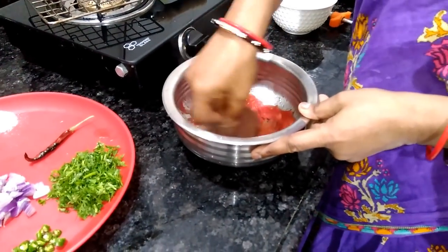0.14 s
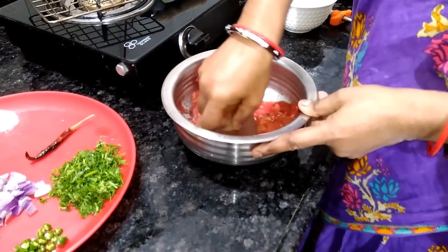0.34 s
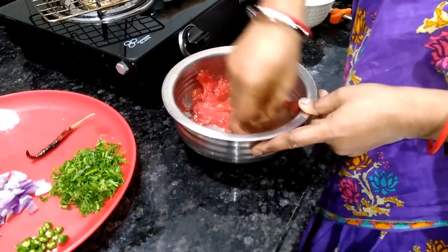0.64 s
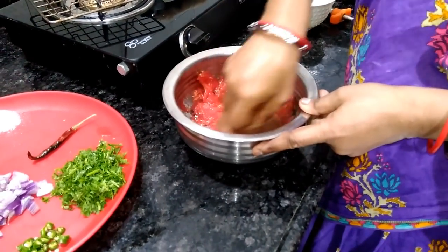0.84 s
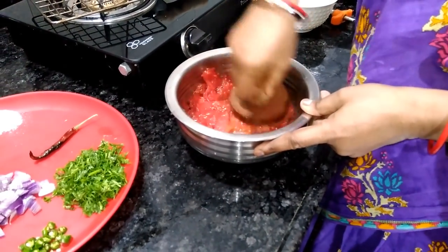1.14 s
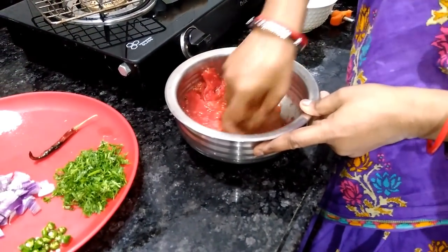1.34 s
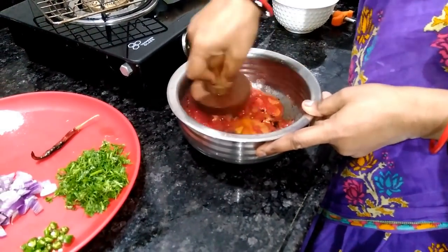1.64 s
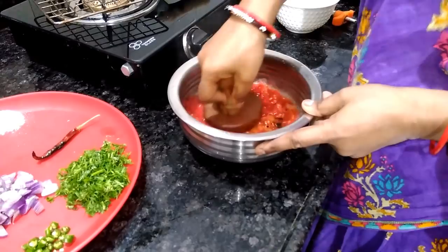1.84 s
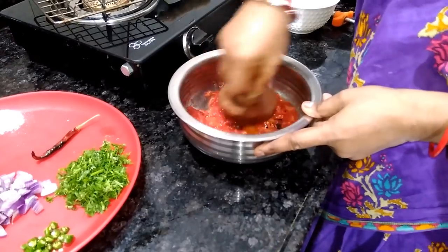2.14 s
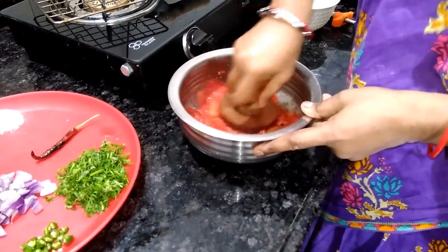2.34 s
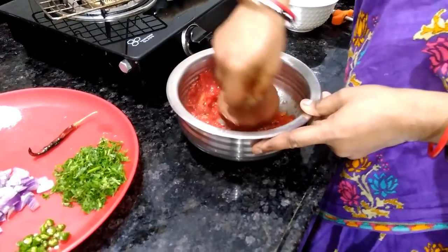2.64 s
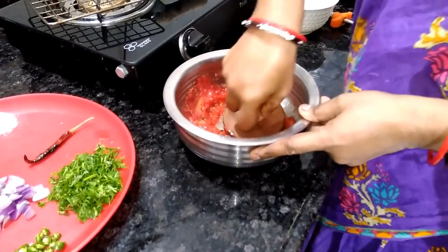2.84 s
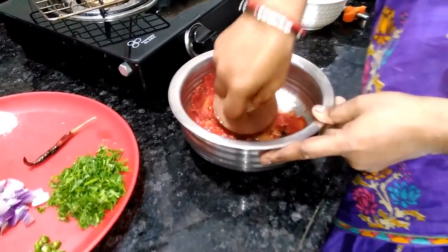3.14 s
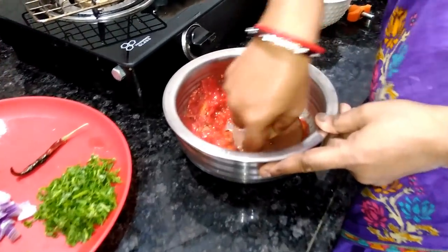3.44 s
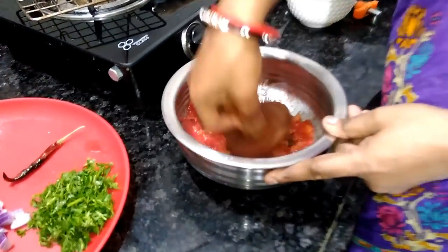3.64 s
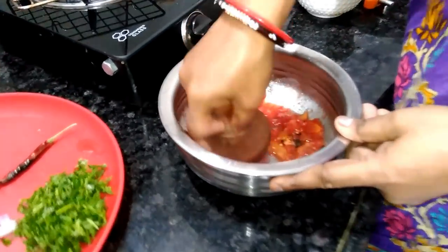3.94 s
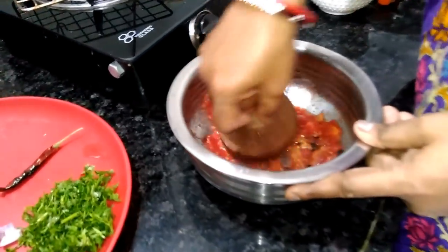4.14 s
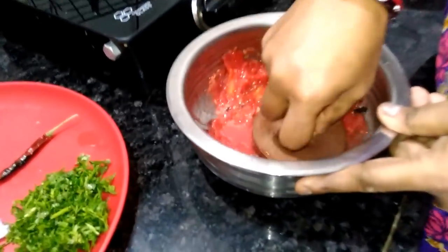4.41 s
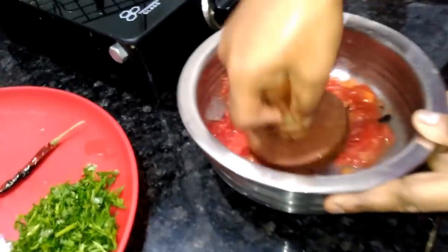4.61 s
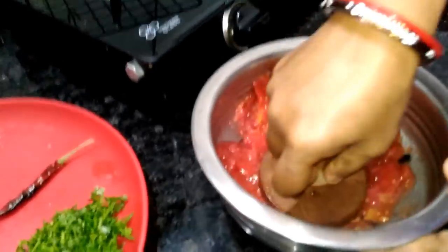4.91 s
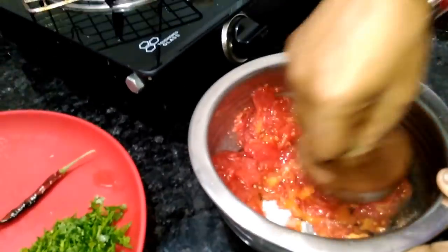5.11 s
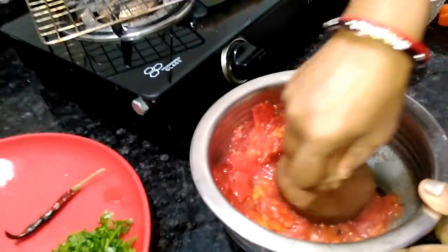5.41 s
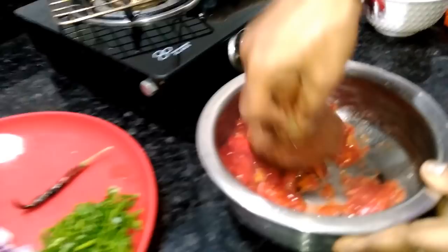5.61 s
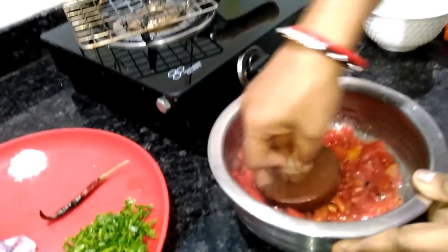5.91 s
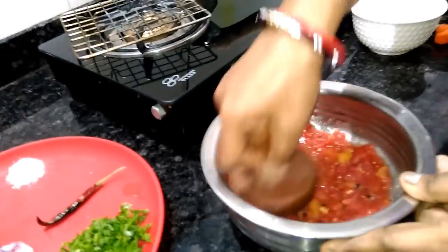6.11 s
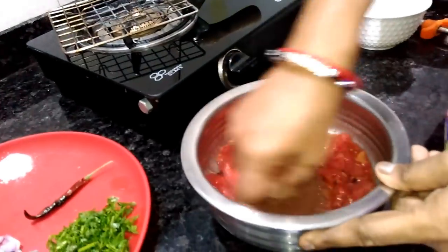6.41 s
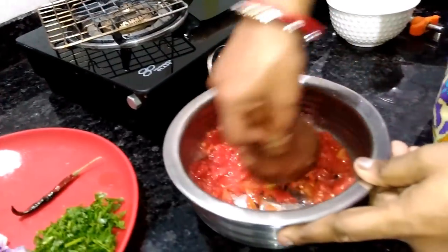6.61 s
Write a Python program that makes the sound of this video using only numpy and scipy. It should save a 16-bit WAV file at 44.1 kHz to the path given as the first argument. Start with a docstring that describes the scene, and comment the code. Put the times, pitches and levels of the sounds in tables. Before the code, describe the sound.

A wooden masher knocks unevenly inside a hand-damped steel bowl, squelching wet tomato pulp, with low hum in a hard kitchen.

```python
"""A hard-walled kitchen with a stone counter, heard through two microphone ports set close together.
A wooden masher crushes tomatoes in a steel bowl: each contact rings the damped modes briefly, with a
crack of noise and a spatter of juice, and the room echoes them. Pulp squelches as filtered grains; drags
of the masher and one pitched spatter are narrow noise. Under it lie room air and a low hum of three
wavering tones in room resonances, where handling thumps sound too; a thin whistle starts at the end."""
import sys
import numpy as np
from scipy import signal
from scipy.fft import rfft, irfft, next_fast_len
from scipy.io import wavfile

SR = 44100
rng = np.random.default_rng(int(sys.argv[2]) if len(sys.argv) > 2 else 0)


def unload_audio(sound):
    """Save the sound as a 16-bit wav file, at the path given as the first command line argument."""
    columns = np.transpose(np.atleast_2d(sound))
    # keep every value between -1 and 1, then stretch to whole-number steps
    steps = np.round(np.clip(columns, -1, 1) * 32767)
    wavfile.write(sys.argv[1], SR, steps.astype(np.int16))


N = 298283   # samples


def amp(db):
    """Decibels to gain."""
    return 10 ** (np.asarray(db) / 20)


def rms_one(x):
    """Scale to unit rms."""
    return x / np.sqrt(np.mean(x ** 2) + 1e-20)


def in_time(rows):
    """Columns of a curve table, joined by straight lines, one value a sample."""
    s, *columns = np.transpose(rows)
    return [np.interp(np.arange(N) / SR, s, column) for column in columns]


def at_hz(points, hz):
    """Read a spectrum table on a log-frequency axis."""
    point_hz, values = np.array(points)[:, 0], np.array(points)[:, 1]
    return np.interp(np.log(np.maximum(hz, 1)), np.log(point_hz), values)


def coloured(x, spectrum):
    """Impose a spectrum on a signal."""
    size = next_fast_len(len(x))
    gain = amp(at_hz(spectrum, np.fft.rfftfreq(size, 1 / SR)))
    return irfft(rfft(x, size) * gain, size)[:len(x)]


def drift(rate_hz):
    """Slow chance with unit rms: noise through two equal low-pass poles, made at every 40th sample."""
    pole = np.exp(-2 * np.pi * rate_hz * 40 / SR)
    noise = rng.standard_normal(N // 40 + 2002)
    slow = signal.lfilter([1], [1, -2 * pole, pole * pole], noise)[2000:]   # drop the filter's start
    return np.interp(np.arange(N) / 40, np.arange(len(slow)), rms_one(slow))


def ring(force, hz, t60):
    """One resonant mode: a unit click sets off a decaying sine of starting height 1."""
    radius, angle = amp(-60 / (t60 * SR)), 2 * np.pi * hz / SR
    return signal.lfilter([0, np.sin(angle)], [1, -2 * radius * np.cos(angle), radius ** 2], force + 1e-18)


def burst_at_contacts(level_db, decay_s):
    """An envelope that jumps up at every contact and dies away exponentially."""
    strength = np.zeros(N)
    strength[(np.array(CONTACTS)[:, 0] * SR).astype(int)] = amp(level_db)
    return signal.lfilter([1], [1, -np.exp(-1 / (decay_s * SR))], strength + 1e-18)


# Air of the room. Each row: frequency in Hz, relative density in dB per Hz.
AIR_SPECTRUM = [(20, -45), (35, -2), (54, -9.5), (80, 0), (125, -3), (176, -4.5), (328, -16.5), (689, -23),
                (1190, -28), (2120, -29.5), (3050, -40), (4500, -51), (8000, -53), (14000, -62)]
AIR_DB = -52.5


def room_air():
    """Steady noise of the room, rumbling low and thin in the treble."""
    return amp(AIR_DB) * rms_one(coloured(rng.standard_normal(N), AIR_SPECTRUM))


# Echo decay of the hard-walled kitchen. Each row: frequency in Hz, time to fall 60 dB in seconds.
KITCHEN_DECAY = [(150, 0.81), (400, 0.62), (1040, 0.59), (2760, 0.48), (7280, 0.39), (14000, 0.062)]
FIRST_ECHO_S = 0.0037   # silence before the echoes, and then their fade-in time


def kitchen(x):
    """Dense echoes: noise that dies away in each band, mostly octaves, at its own pace."""
    t = np.arange(SR) / SR
    echoes, edges = np.zeros(SR), 100 * 2. ** np.arange(8)
    for low, high in zip(edges, np.append(edges[1:], .45 * SR)):
        octave = signal.butter(2, [low, high], "band", fs=SR, output="sos")
        band = signal.sosfilt(octave, rng.standard_normal(SR))
        echoes += band * amp(-60 * t / at_hz(KITCHEN_DECAY, np.sqrt(low * high)))
    echoes *= np.clip(t / FIRST_ECHO_S - 1, 0, 1)
    return signal.fftconvolve(x, echoes / np.sqrt(np.sum(echoes ** 2)))[:N]


# Course of the hum. Each row: time in seconds, level of the low tone in dB, of the middle tone in dB.
HUM_LEVELS = [(0.0, -44, -41.5), (0.11, -52, -66), (0.68, -50.5, -49), (1.26, -62, -60.5),
              (1.39, -38, -46.5), (1.88, -52.5, -57), (2.16, -42.5, -48.5), (2.48, -54.5, -43.5),
              (2.63, -53.5, -72), (2.77, -47.5, -46), (3.16, -48.5, -74), (3.24, -48, -43),
              (4.25, -46, -56.5), (4.33, -59, -56), (4.5, -42.5, -46), (4.89, -53.5, -56.5),
              (4.93, -44, -39.5), (5.82, -52.5, -55), (6.65, -47.5, -47.5), (6.76, -51.5, -40)]
# Low thumps of handling, sounding in the same three resonances.
# Each row: peak time in seconds, level in the low, middle and high resonance in dB.
LOW_THUMPS = [(0.45, -57, -62, -44), (0.94, -42.5, -55.5, -71), (2.371, -38.5, -37.5, -53),
              (3.03, -44, -70, -85), (3.69, -31, -54, -51), (3.99, -41, -57, -55.5),
              (4.12, -51.5, -64, -49), (4.22, -34, -48, -65), (4.52, -39, -50, -54),
              (4.95, -37.5, -30, -43), (5.74, -40, -66, -60)]
HUM_HZ, HUM_WANDER_HZ, WANDER_RATE_HZ = (60.6, 102.8, 158.3), (6, 3, 8), 9
HUM_HIGH_DB, WAVER_DB, WAVER_RATE_HZ = -57.5, 3, 3.7
THUMP_S = 0.017   # from the peak of a thump to 1/e


def hum_and_thumps():
    """Low tones wander about the room resonances: a wavering hum, and thumps of handling on the same tones."""
    tones = []
    for hz, wander_hz in zip(HUM_HZ, HUM_WANDER_HZ):
        pitch_hz = hz + wander_hz * drift(WANDER_RATE_HZ)
        tones.append(np.sin(2 * np.pi * np.cumsum(pitch_hz) / SR))
    s, *thump_db = np.transpose(LOW_THUMPS)
    bumps = np.exp(-((np.arange(N) / SR - s[:, None]) / THUMP_S) ** 2)
    thumps = amp(thump_db) @ bumps
    courses_db = (*in_time(HUM_LEVELS), HUM_HIGH_DB)
    hum = [amp(db + WAVER_DB * drift(WAVER_RATE_HZ)) for db in courses_db]
    # root two makes the levels those of rms
    return np.sqrt(2) * sum((a + b) * tone for a, b, tone in zip(hum, thumps, tones))


WHISTLE_AT_S, WHISTLE_SWELL_S = 6.55, 0.11
WHISTLE_HZ, WHISTLE_DB, FLUTTER_DB, FLUTTER_RATE_HZ = 3290, -57, 2.5, 53


def whistle():
    """A thin sine of fixed pitch and fluttering level that swells in and holds."""
    t = np.arange(N) / SR
    swell = np.clip((t - WHISTLE_AT_S) / WHISTLE_SWELL_S, 0, 1) ** 2
    level = np.sqrt(2) * amp(WHISTLE_DB + FLUTTER_DB * drift(FLUTTER_RATE_HZ))
    return swell * level * np.sin(2 * np.pi * WHISTLE_HZ * t)


OOZE_PEAK_S = 0.084   # from a thud to the peak of its ooze


def ooze():
    """Pulp oozes back after each thud: a swell that peaks at the thud's strength and fades."""
    contacts = np.array(CONTACTS)
    late = np.maximum(np.arange(N) / SR - contacts[:, :1], 0) / OOZE_PEAK_S
    return amp(contacts[:, 1]) @ (late * np.exp(1 - late)) ** 2


# Pulp worked round the bowl. Each row: time in seconds, squelch level in dB, wet hiss level in dB.
SQUELCH_LEVELS = [(0, -59.5, -74), (.52, -52.5, -82.5), (.83, -65, -74), (1.1, -63, -77.5),
                  (1.9, -62, -77.5), (2.9, -57.5, -83), (3.26, -56.5, -80.5), (3.99, -53, -77),
                  (4.27, -50, -73), (4.7, -47.5, -76.5), (5.3, -53, -79), (5.7, -57.5, -71.5),
                  (6.06, -54, -77), (6.5, -52.5, -79.5), (6.76, -51, -78)]
# Colour of the squelch. Each row: frequency in Hz, relative gain in dB.
PULP_SPECTRUM = [(120, -18.5), (200, 0), (400, -7), (680, -8), (940, -9), (1340, -26), (3050, -40),
                 (6000, -52), (14000, -60)]
# Colour of the juice hiss. Each row: frequency in Hz, relative gain in dB.
HISS_SPECTRUM = [(2000, -9.5), (3500, -1), (5000, -11.5), (8000, -15.5), (14000, -19.5)]
OOZE_DB, OOZE_HISS_DB = -38, -67.5   # relative to the thud


def squelch():
    """Uneven wet grains that also stir the bowl modes, with a finer hiss of juice above."""
    squelch_db, hiss_db = in_time(SQUELCH_LEVELS)
    grains = rng.standard_normal(N) * amp(3.0 * drift(25.0) + 3.5 * drift(8.0))
    stirred = np.zeros(N)
    for hz, mode_db, t60 in BOWL_MODES:
        # the modes ring four times longer here than under a contact
        stirred += amp(mode_db + 7.0 * drift(6.0)) * ring(grains, hz, t60 * 4.0)
    mixed = grains + .5 * rms_one(stirred)
    juice = rng.standard_normal(N) * amp(2.5 * drift(40.0))
    back = ooze()
    pulp_level = amp(squelch_db) + amp(OOZE_DB) * back
    juice_level = amp(hiss_db) + amp(OOZE_HISS_DB) * back
    return (pulp_level * rms_one(coloured(mixed, PULP_SPECTRUM))
            + juice_level * rms_one(coloured(juice, HISS_SPECTRUM)))


# Narrow noises: the masher drags and the bowl sings; the 7500 Hz one is a pitched spatter of juice.
# Each row: start in seconds, length in seconds, pitch in Hz, resonance width in Hz, level in dB.
NARROW_NOISES = [(0.995, 0.12, 833, 25, -56.5), (1.245, 0.053, 1070, 40, -46), (2.195, 0.26, 557, 30, -56),
                 (2.56, 0.3, 925, 39, -58.5), (3.627, 0.16, 1660, 59, -65), (4.1, 0.14, 163, 25.45, -45),
                 (4.16, 0.073, 7500, 202, -65.5), (4.267, 0.086, 680, 30.46, -61),
                 (5.802, 0.059, 863, 40, -56.5)]


def narrow_noises():
    """Noise of friction, or of juice at 7500 Hz, held in one narrow resonance that swells and fades."""
    t, noise, out = np.arange(N) / SR, rng.standard_normal(N), np.zeros(N)
    for s, length, hz, width_hz, level_db in NARROW_NOISES:
        swell = np.sin(np.pi * np.clip((t - s) / length, 0, 1)) ** .5
        t60 = np.log(1000) / (np.pi * width_hz)
        out += amp(level_db) * swell * rms_one(ring(noise, hz, t60))
    return out


# Colour of the spattering juice. Each row: frequency in Hz, relative gain in dB.
SPATTER_SPECTRUM = [(4000, 3.5), (5500, -6), (7500, -11), (10000, -10.5), (14000, -30)]
SPATTER_RISE_S, SPATTER_DECAY_S = 0.0053, 0.0052


def spatter():
    """Juice squirts out at each contact: a short, bright, grainy burst."""
    dying = burst_at_contacts(np.array(CONTACTS)[:, 4] + 3, SPATTER_DECAY_S)
    rise = np.exp(-1 / (SPATTER_RISE_S * SR))
    grains = rng.standard_normal(N) * amp(3.0 * drift(200.0))
    return signal.lfilter([1 - rise], [1, -rise], dying) * rms_one(coloured(grains, SPATTER_SPECTRUM))


CRACK_DB, CRACK_DECAY_S, CRACK_BAND_HZ = -34, 0.0011, (3500, 9000)   # level relative to the knock


def crack():
    """Wood on steel: a very short bright snap at the first touch, following the knock."""
    dying = burst_at_contacts(np.array(CONTACTS)[:, 2] + CRACK_DB, CRACK_DECAY_S)
    band = signal.butter(2, CRACK_BAND_HZ, "band", fs=SR, output="sos")
    return signal.sosfilt(band, dying * rng.standard_normal(N))


# Masher contacts. Each row: start in seconds, relative levels of thud, knock, clink and spatter in dB,
# then the two pitches in Hz that the landing spot favours.
CONTACTS = [(0.137, -67, -44.5, -63, -89, 2000, 2330), (0.1905, -37, -43, -49, -51.5, 1360, 2400),
            (0.4358, -16.5, -35.5, -72, -62.5, 590, 1090), (0.5995, -47, -57, -52, -62, 2000, 2640),
            (0.7558, -34, -31.5, -39, -51.5, 1390, 3020), (0.822, -40.5, -35, -46.5, -66, 850, 1360),
            (1.0137, -53.5, -51, -43.5, -53, 2150, 2860), (1.1007, -60, -41, -44.5, -81, 2180, 3010),
            (1.279, -9.5, -0.5, -28.5, -39.5, 655, 1860), (1.516, -37.5, -32.5, -57, -54.5, 664, 1480),
            (1.819, -43, -45.5, -44, -51, 730, 2330), (1.8348, -23.5, -24, -23.5, -28.5, 770, 1560),
            (2.3296, -52, -26.5, -38, -40.5, 1500, 2580), (2.3492, -14, -19, -32, -47, 603, 1500),
            (2.8319, -47, -63, -52.5, -61, 1420, 4220), (2.9947, -43.5, -38.5, -57, -56, 1322, 4450),
            (3.475, -33.5, -37.5, -89, -67, 640, 1247), (3.925, -59.5, -37.5, -77.5, -68, 684, 1610),
            (3.9636, -56.5, -41, -54, -74.5, 1700, 3230), (3.9902, -51.5, -25.5, -44, -59.5, 1990, 2596),
            (4.0103, -51, -42.5, -51.5, -63.5, 2180, 2960), (4.1691, -36, -30.5, -49.5, -49, 1610, 2640),
            (4.365, -52.5, -32, -39, -69.5, 1625, 2775), (4.4275, -11, 1, -27.5, -32, 699, 1577),
            (4.7392, -37.5, -28, -46, -85, 685, 2060), (4.78, -61, -29.5, -51, -92, 1660, 2800),
            (4.8649, -5.5, -8.5, -25.5, -38, 1346, 3580), (4.9294, -21, -50, -31, -34.5, 625, 2700),
            (4.9441, -40, -24, -35, -43.5, 1440, 4850), (5.1494, -58, -32, -61, -64.5, 1120, 2590),
            (5.3672, -5, -3, -23, -49, 720, 2300), (5.3844, -31, -11.5, -25, -37, 677, 1191),
            (5.395, -21, -30, -39, -42, 2490, 3850), (5.7037, -48.5, -47, -51.5, -86, 850, 2270),
            (5.779, -61.5, -46, -66.5, -61, 1645, 3760), (5.8389, -59, -51, -43.5, -45, 2300, 4100),
            (5.8577, -62.5, -60, -61, -44, 1510, 3610), (5.878, -52, -38.5, -65, -66, 1540, 3430),
            (6.3134, -62.5, -59, -60.5, -53, 1294, 4200), (6.3686, -65, -56, -77, -53, 1470, 4250),
            (6.3809, -56, -41.5, -73, -78, 1440, 2950), (6.4226, -28, -42, -68, -66, 760, 1020)]
# The bowl, damped by hand and pulp.
# Each row: mode frequency in Hz, relative level in dB, time to fall 60 dB in seconds after a contact.
BOWL_MODES = [(244.2, -5, 0.065), (312, -2, 0.044), (415.6, 1.5, 0.044), (530.3, -4, 0.056),
              (672.2, -2, 0.045), (791.5, -7, 0.055), (845, -3.5, 0.04), (1039, -11, 0.041),
              (1183, 1.5, 0.013), (1360, 1.5, 0.015), (1500, 0, 0.015), (1610, 0, 0.011), (1775, -3, 0.024),
              (1907, -1.5, 0.0075), (2294, 1.5, .018), (2590, 2, 0.025), (2890, 2.5, 0.019),
              (3018, -1, 0.015), (3650, -4, 0.018), (3868, 4, 0.016), (4250, 1.5, 0.017),
              (4750, -5.5, 0.022)]
# centres of the five mode groups, Hz: push, thud, knock, clink, tick
GROUP_HZ = (244, 680, 1502, 2800, 4200)
# the push follows the thud in part, less where the knock outweighs it
PUSH_DB, PUSH_FOLLOWS, PUSH_LOSS = -16.5, 0.64, 1.2
TICK_DB, TICK_WETNESS = 1, .55   # the tick lies between clink and spatter
FAVOUR_DB, FAVOUR_OCTAVES, STRIKE_SPREAD_DB = 9, 0.093, 1.56
SLIDE_S, HARD_DB = .006, -30   # contacts weaker than a hard blow slide on in several touches
CONTACT_OCTAVES = 0.48   # a soft wet contact drives each mode only near its pitch


def bowl():
    """Every contact strikes all modes; where it lands weights the groups and favours two pitches."""
    s, thud_db, knock_db, clink_db, spatter_db, *favoured_hz = np.transpose(CONTACTS)
    push_db = PUSH_DB + PUSH_FOLLOWS * thud_db - PUSH_LOSS * np.clip(knock_db - thud_db, 0, 12)
    tick_db = TICK_DB + clink_db + TICK_WETNESS * (spatter_db - clink_db)
    contact_groups_db = list(zip(push_db, thud_db, knock_db, clink_db, tick_db))

    # one first touch and three later ones, which only softer contacts sound
    softness = np.clip((HARD_DB - np.maximum(knock_db, clink_db)) / 20, 0, 1)[:, None]
    later = np.sort(rng.random((len(s), 4)), axis=1) * [0, 1, 1, 1] * SLIDE_S * softness
    touch_at = ((s[:, None] + later) * SR).astype(int)
    share = np.where(np.arange(4) == 0, 1, 0.51 * softness)
    share = share / np.linalg.norm(share, axis=1, keepdims=True)

    chance = rng.standard_normal((len(s), len(BOWL_MODES)))
    out = np.zeros(N)
    for k, (hz, mode_db, t60) in enumerate(BOWL_MODES):
        group_db = np.array([at_hz(list(zip(GROUP_HZ, levels)), hz) for levels in contact_groups_db])
        near = sum(np.exp(-(np.log2(hz / f) / FAVOUR_OCTAVES) ** 2) for f in favoured_hz)
        strike_db = group_db + mode_db + FAVOUR_DB * near + STRIKE_SPREAD_DB * chance[:, k] - 5
        force = np.zeros(N)
        np.add.at(force, touch_at, amp(strike_db)[:, None] * share)
        band_hz = hz * 2 ** (np.array([-1, 1]) * CONTACT_OCTAVES / 2)
        contact = signal.butter(2, band_hz, "band", fs=SR, output="sos")
        out += signal.sosfilt(contact, ring(force, hz, t60))
    return out


# Diffuse sound own to each port. Each row: frequency in Hz, gain in dB.
UNSHARED_GAIN = [(30, -19.5), (1000, -23), (4000, -7.5), (12000, -2.5)]
KITCHEN_DB = -5   # echoes relative to the direct sound


def scene():
    """What both ports share, plus a little diffuse sound of their own."""
    struck = bowl() + crack() + spatter() + narrow_noises()
    steady = squelch() + hum_and_thumps() + whistle()
    # the bowl shifts between contacts, so its echoes take one of four paths
    path = np.searchsorted(np.array(CONTACTS)[:, 0], np.arange(N) / SR) % 4
    shared_echo = sum(kitchen(struck * (path == k)) for k in range(4))
    air = [room_air() for _ in range(3)]
    echoes = (shared_echo, kitchen(struck), kitchen(struck))
    shared, *own_to_port = [amp(KITCHEN_DB) * echo + a for echo, a in zip(echoes, air)]
    # squelch, hum, thumps and whistle come without echoes
    return np.array([struck + steady + shared + coloured(own, UNSHARED_GAIN) for own in own_to_port])


# Balance of the ports. Each row: frequency in Hz, left minus right in dB.
LEFT_OVER_RIGHT = [(60, 4.5), (91, 2.5), (140, 3), (210, 0), (490, -2), (1130, 0), (1710, 5.5), (2600, 5.5),
                   (4500, 7), (8000, 6.5), (13000, 2.5)]
# Phase between the ports. Each row: frequency in Hz, lead of the left in radians.
LEFT_PHASE_LEAD = [(30, 0), (260, -.2), (600, 0.23), (1460, 0.67), (2760, -0.44), (6000, 0.1),
                   (12000, 0.99)]
CUTOFF_HZ = 14800   # from here up at least 50 dB down


def record(dry):
    """Two close ports differ in level and phase by frequency; peaks overload, the top is cut."""
    size = next_fast_len(N + 4096)
    # mirrored ends keep the filter from wrapping round
    margins = ((0, 0), (2048, size - N - 2048))
    padded = np.pad(dry, margins, mode="reflect", reflect_type="odd")
    hz = np.fft.rfftfreq(size, 1 / SR)
    # half of each difference goes to either port
    half = amp(at_hz(LEFT_OVER_RIGHT, hz) / 2) * np.exp(.5j * at_hz(LEFT_PHASE_LEAD, hz))
    ports = irfft(rfft(padded) * np.array([half, 1 / half]), size)[:, 2048:2048 + N]
    top_cut = signal.cheby2(12, 50, CUTOFF_HZ, fs=SR, output="sos")
    return signal.sosfilt(top_cut, np.clip(ports, -1, 1))


dry = scene()
out = record(dry)
unload_audio(out)
```